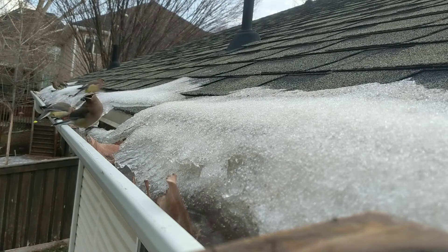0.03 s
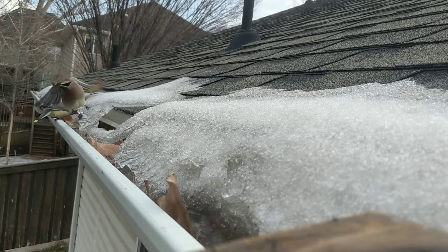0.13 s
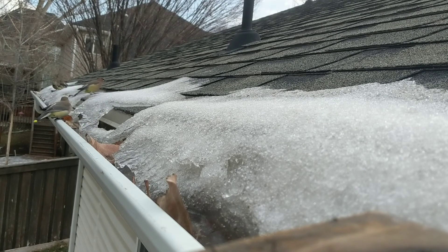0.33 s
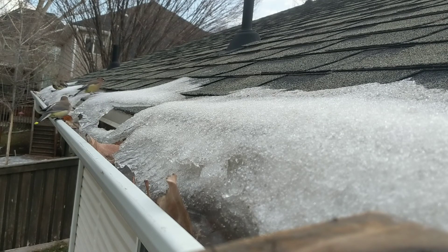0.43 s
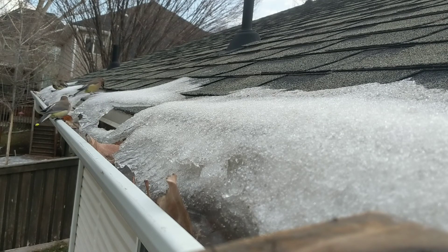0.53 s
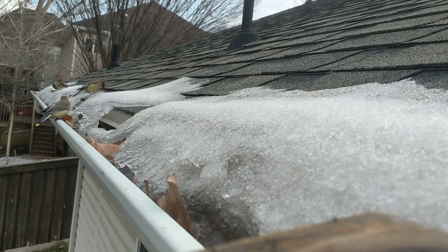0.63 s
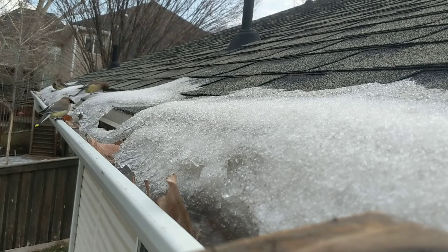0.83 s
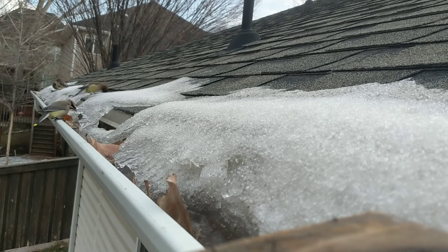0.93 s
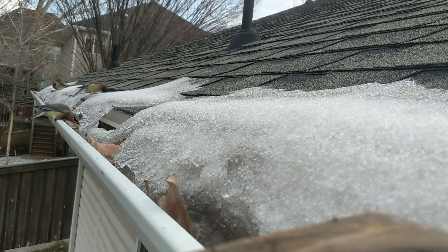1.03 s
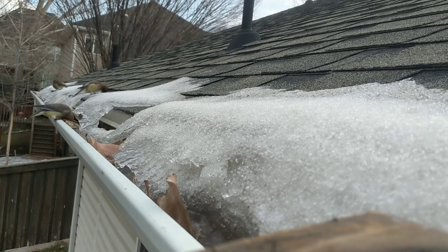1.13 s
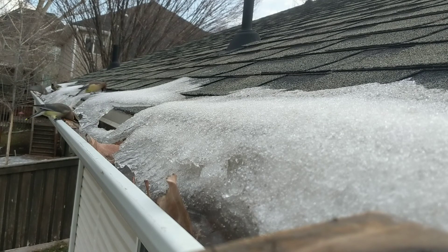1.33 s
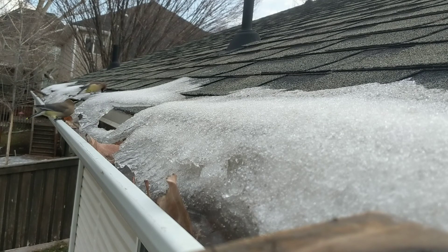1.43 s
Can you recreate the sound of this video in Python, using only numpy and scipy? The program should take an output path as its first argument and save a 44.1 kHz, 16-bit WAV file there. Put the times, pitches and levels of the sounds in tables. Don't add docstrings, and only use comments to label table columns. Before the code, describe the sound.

Faint hiss, low town rumble and distant bird whistles open. At about 0.2 seconds a small nearby bird gives a very high, fast trill, alternating between two close pitches until 0.43, with a light outdoor echo. Soft, rapid wingbeats flutter from 0.2 to 0.75, strongest near 0.45. Claws tick on metal around 1.05 and 1.45, with a dull thud at 1.0; faint flock calls and a distant engine continue.

```python
import sys
import numpy as np
from scipy import signal
from scipy.fft import rfft, irfft
from scipy.io import wavfile
from scipy.ndimage import uniform_filter1d

SR = 44100
rng = np.random.default_rng(int(sys.argv[2]) if len(sys.argv) > 2 else 0)


def how_loud(loudness_db):
    steps = np.asarray(loudness_db, float) / 20
    return 10 ** steps


def put_to_file(sound):
    columns = np.atleast_2d(sound).T
    safe = np.clip(columns, -1, 1)
    whole_steps = np.round(safe * 32767)
    wavfile.write(sys.argv[1], SR, whole_steps.astype(np.int16))


N = 66150

# rise_hz, rise_s, drop_hz, drop_start_share, pause_after_s
ARCHES = [
    (1270, 0.008, 3000, 0.56, 0.0025),
    (1230, 0.00254, 870, 0.62, 0.000068),
    (960, 0.00193, 2400, 0.63, 0.0016),
    (1010, 0.0017, 230, 0.73, 0.0019),
]
# snap_s, level_db
BEATS = [(0.226, -73), (0.271, -66.5), (0.328, -61), (0.379, -62.5), (0.428, -58.5), (0.476, -59.5),
         (0.524, -59), (0.577, -61.5), (0.631, -65.5), (0.679, -67), (0.732, -68)]


def rms_one(x):
    return x / np.sqrt(np.mean(x ** 2) + 1e-20)


def band(x, low_hz, high_hz, order=2):
    return signal.sosfilt(signal.butter(order, [low_hz, high_hz], "band", fs=SR, output="sos"), x)


def drift(rate_hz):
    r = np.exp(-2 * np.pi * rate_hz / SR)
    settled = signal.lfilter([1], [1, -2 * r, r * r], rng.standard_normal(N + SR))[SR:]
    return rms_one(settled)


def add(out, start_s, sound):
    i = max(int(start_s * SR), 0)
    out[i:i + len(sound)] += sound[:N - i]


def bump(t, centre_s, width_s):
    return np.exp(-((t - centre_s) / width_s) ** 2)


def tone(hz, level_db, edge_s):
    octave_db = -48
    t = np.arange(len(hz)) / SR
    phase = 2 * np.pi * np.cumsum(hz) / SR
    ends = np.sin(np.pi / 2 * np.clip(np.minimum(t, t[::-1]) / edge_s, 0, 1)) ** 2
    return how_loud(level_db) * ends * (np.sin(phase) + how_loud(octave_db) * np.sin(2 * phase))


def arch(length_s, top_hz, shape):
    drop_curve = 1.4
    rise_hz, rise_s, drop_hz, drop_start = shape[:4]
    t = np.arange(int(length_s * SR)) / SR
    slide = np.clip((t / length_s - drop_start) / (1 - drop_start), 0, 1)
    return top_hz - rise_hz * np.exp(-t / rise_s) - drop_hz * slide ** drop_curve


def coloured(spectrum, patchy_db):
    hz, db = np.transpose(spectrum)
    edges_hz = np.geomspace(hz[0], hz[-1], int(3 * np.log2(hz[-1] / hz[0])) + 1)
    white = rng.standard_normal((2, N + SR))
    together = drift(4)
    out = 0
    for k, (low_hz, high_hz) in enumerate(zip(edges_hz, edges_hz[1:])):
        level_db = np.interp(np.log(low_hz * high_hz) / 2, np.log(hz), db)
        flicker_db = patchy_db * (0.277 * together + drift(42))
        out = out + how_loud(level_db + flicker_db) * band(white[k % 2], low_hz, high_hz)[SR:]
    return rms_one(out)


def town_rumble():
    rumble_db = -63.5
    # centre_hz, density_db
    spectrum = [(30, -29), (45, -4), (64, -2.5), (98, -6.5), (128, -16), (160, -10.5), (388, -19),
                (900, -26)]
    # time_s, change_db
    traffic = [(0, -1.5), (.2, -0.5), (.33, 2.5), (.5, 1), (.63, 0.5), (0.799, -0.5), (1.049, 1), (1.3, -1),
               (1.5, 0.5)]
    swell_db = np.interp(np.arange(N) / SR, *np.transpose(traffic))
    return how_loud(rumble_db + swell_db) * coloured(spectrum, patchy_db=2.0)


def open_air():
    air_db = -72.5
    # centre_hz, density_db
    spectrum = [(800, -1.5), (1300, 0), (2200, -2.5), (4500, -8.5), (7000, -13), (8200, -16.5),
                (11000, -19.5), (16000, -16.5)]
    return how_loud(air_db) * coloured(spectrum, patchy_db=1.7)


def booms():
    # centre_s, pitch_hz, length_s, level_db
    boom_events = [(0.089, 59.4, 0.026, -58.5), (.15, 181.4, .06, -66.5), (0.287, 92.5, 0.035, -57),
                   (0.361, 59.8, 0.043, -57), (0.631, 88, 0.027, -56), (.66, 209, 0.037, -67.5),
                   (.82, 80, .05, -63), (1.04, 208, 0.023, -61), (1.12, 48.6, .05, -59),
                   (1.24, 71, 0.044, -61), (1.37, 62.4, 0.042, -64)]
    t = np.arange(N) / SR
    out = np.zeros(N)
    for s, hz, length_s, db in boom_events:
        out += how_loud(db) * bump(t, s, length_s) * np.sin(2 * np.pi * hz * (t - s))
    return out


def motor():
    # time_s, firing_hz, level_db
    speed = [(0, 104, -68), (.2, 109.5, -78), (0.348, 118.2, -66.5), (.5, 121.1, -64.5),
             (.62, 122.4, -61.5), (0.751, 125.1, -70.5), (.95, 128.8, -65), (1.0, 130, -74),
             (1.101, 132.5, -67), (1.5, 138.7, -64)]
    # firing_multiple, level_db
    orders = [
        (1, -0.5),
        (1.5, -11.5),
        (2.42, -16),
    ]
    s, hz, db = np.transpose(speed)
    t = np.arange(N) / SR
    turns = np.cumsum(np.interp(t, s, hz)) / SR
    tones = 0
    for multiple, order_db in orders:
        tones = tones + how_loud(order_db + drift(4.2)) * np.sin(2 * np.pi * multiple * turns)
    return how_loud(np.interp(t, s, db) + 1) * tones


def flock_chatter():
    low_hz, top_hz, flicker_db = 2200, 7600, 2.0
    # time_s, level_db
    chatter = [(0, -72.5), (.1, -75.5), (.5, -69), (.9, -78.5), (1.1, -74.5), (1.25, -84.5), (1.5, -73.5)]
    s, db = np.transpose(chatter)
    noise = band(rng.standard_normal(N), low_hz, top_hz, order=8)
    level_db = np.interp(np.arange(N) / SR, s, db) + flicker_db * drift(31)
    return how_loud(level_db) * rms_one(noise)


def far_birds():
    waver_hz, flicker_db, wet_db, smear_t60_s = 20, 6.0, -6, 0.1
    whistle_db, whistle_edge_s, mate_edge_s = -5.5, 0.0025, 0.0012
    # start_s, length_s, top_hz, level_db
    mate_notes = [(0.408, .012, 7540, -52), (0.159, 0.024, 7070, -70.5), (0.782, 0.014, 7350, -70.5),
                  (0.803, 0.012, 6970, -73), (0.832, 0.013, 7280, -78), (0.847, 0.011, 7100, -73),
                  (1.177, 0.016, 7180, -71), (1.206, 0.0051, 7240, -71), (1.216, 0.013, 7240, -65.5),
                  (1.388, 0.0089, 7000, -54.5), (1.3995, 0.018, 7166, -65), (1.415, 0.011, 7350, -72.5),
                  (1.429, 0.0092, 7400, -62.5), (1.468, 0.009, 7300, -69)]
    # start_s, length_s, from_hz, to_hz, level_db
    whistle_notes = [(0, 0.023, 3785, 4505, -60.5), (.002, 0.017, 5800, 5440, -65),
                     (0.018, 0.075, 4340, 4270, -67.5), (0.078, 0.038, 4220, 3750, -83),
                     (0.146, 0.014, 4820, 6600, -63), (.2355, 0.0032, 9600, 9250, -51),
                     (0.16, 0.05, 4510, 4480, -64), (0.201, 0.072, 3640, 3647, -64),
                     (0.28, 0.0061, 4830, 4000, -56.5), (0.324, 0.053, 2382, 2656, -66),
                     (0.639, 0.21, 3633, 3566, -71), (0.743, .016, 2874, 2700, -62.5),
                     (0.869, 0.009, 6500, 5400, -62), (0.879, 0.025, 3404, 3390, -64),
                     (0.902, 0.028, 3360, 3340, -68.5), (0.894, 0.038, 2154, 2250, -68.5),
                     (0.928, 0.039, 3263, 2870, -65.5), (.993, 0.047, 4130, 3500, -70),
                     (0.994, 0.056, 2650, 2374, -68), (1.062, 0.013, 5930, 5900, -65),
                     (1.068, 0.08, 5420, 5020, -70), (1.109, 0.011, 3450, 3340, -63),
                     (1.169, 0.019, 1628, 1540, -65.5), (1.382, 0.0039, 5450, 5250, -53),
                     (1.4146, 0.0059, 6760, 5340, -48.5), (1.418, 0.0059, 5910, 5350, -55.5),
                     (1.428, 0.02, 2357, 2460, -68), (1.484, 0.033, 5190, 4750, -58.5),
                     (1.488, .009, 6360, 6200, -61)]
    mates, whistles = np.zeros(N), np.zeros(N)
    for s, length_s, top_hz, db in mate_notes:
        add(mates, s, tone(arch(length_s, top_hz, ARCHES[3]), db, mate_edge_s))
    waver = waver_hz * drift(80)
    for s, length_s, from_hz, to_hz, db in whistle_notes:
        hz = np.linspace(from_hz, to_hz, int(length_s * SR))
        hz = hz + np.resize(waver[int(s * SR):], len(hz))
        add(whistles, s, tone(hz, db + whistle_db, whistle_edge_s))
    flicker = flicker_db * drift(100)
    direct = mates * how_loud(flicker / 2) + whistles * how_loud(np.minimum(flicker, 3))
    t = np.arange(SR // 4) / SR
    smear = rng.standard_normal(len(t)) * how_loud(-60 * t / smear_t60_s)
    smear = smear / np.sqrt(np.sum(smear ** 2))
    return direct + how_loud(wet_db) * signal.fftconvolve(direct, smear)[:N]


def gutter():
    tick_rise_s = 0.0002
    thud_s, thud_hz, thud_db, thud_t60_s = 1, 135, -49.5, 0.16
    # start_s, peak_db, centre_hz, t60_s
    claw_ticks = [(0.152, -54, 3060, 0.0042), (1.0243, -51.5, 6360, 0.0098), (1.0243, -52, 4700, 0.0027),
                  (1.025, -53, 1570, 0.0047), (1.0552, -39.5, 6100, 0.0028), (1.0545, -54, 7000, 0.0062),
                  (1.055, -50, 3700, 0.0036), (1.0578, -53, 7300, 0.0044), (1.4555, -46, 5570, 0.0031),
                  (1.4559, -43.5, 3600, 0.0017), (1.456, -48, 6850, 0.0057)]
    out, t = np.zeros(N), np.arange(int(0.3 * SR)) / SR
    for s, db, hz, t60_s in claw_ticks:
        rise = 1 - np.exp(-t / tick_rise_s)
        add(out, s, how_loud(db - 60 * t / t60_s) * rise * np.sin(2 * np.pi * hz * t))
    add(out, thud_s, -how_loud(thud_db - 60 * t / thud_t60_s) * np.sin(2 * np.pi * thud_hz * t))
    return out


def crackle():
    clicks_per_s, spread_s, crackle_db = 700, 0.018, -14
    t = np.arange(N) / SR
    effort = sum(how_loud(db + crackle_db) * bump(t, s, spread_s) for s, db in BEATS)
    clicks = (rng.random(N) < clicks_per_s / SR) * rng.standard_normal(N)
    puffs = uniform_filter1d(np.abs(clicks), size=60) * rng.standard_normal(N)
    return effort * rms_one(band(puffs, 3100, 10500, order=3))


def wings():
    swish_lead_s, swish_s, swish_db = 0.018, 0.0079, -19.5
    push_lead_s, push_hz, push_db = 0.0084, 110, -0.5
    whirr_s, whirr_db = 0.024, -8.5
    snap_s, snap_low_hz, snap_top_hz = 0.0031, 700, 7600
    grain_db = 3.5
    t = np.arange(N) / SR
    swish, snap, push, whirr = np.zeros((4, N))
    for s, db in BEATS:
        swish += how_loud(db + swish_db) * bump(t, s - swish_lead_s, swish_s)
        snap += how_loud(db) * bump(t, s, snap_s)
        whirr += how_loud(db + whirr_db) * bump(t, s, whirr_s)
        cycles = (t - s + push_lead_s) * push_hz
        push += how_loud(db + push_db) * np.exp(-cycles ** 2 * 1.1) * np.sin(2 * np.pi * cycles)
    grain = how_loud(grain_db * drift(200))
    noise = rng.standard_normal((3, N))
    swish_noise = rms_one(band(noise[0], 5600, 11600, order=3))
    snap_noise = rms_one(band(band(noise[1], snap_low_hz, snap_top_hz), 300, snap_top_hz))
    whirr_noise = rms_one(band(noise[2], 5520, 6300))
    return grain * (swish * swish_noise + whirr * whirr_noise) + snap * snap_noise + push


def trill():
    end_s, edge_s, waver_hz = 0.426, 0.0012, 7.2
    throat_hz, throat_db_per_khz = 6430, 14.5
    # start_s, top_hz, early_db, middle_db, late_db
    trill_notes = [(0.2195, 7065, -47, -29, -28.5), (0.2419, 7513, -30, -32.5, -29.5),
                   (.257, 6940, -32.5, -33, -33.5), (.279, 7530, -30.5, -37.5, -39),
                   (0.2962, 7160, -30.5, -29.5, -34), (0.3164, 7400, -39.5, -51.5, -37),
                   (0.3335, 6910, -44.5, -59, -35), (0.3551, 7300, -34.5, -51, -39.5),
                   (0.3731, 6910, -37, -36.5, -32.5), (0.393, 7610, -36.5, -45.5, -38),
                   (0.408, 6750, -36.5, -39, -49)]
    level_places = [
        (0.2, .52, .8),
        (.17, 0.56, 0.96),
        (.17, 0.43, 0.84),
        (0.13, 0.48, .85),
    ]
    out, waver = np.zeros(N), waver_hz * drift(150)
    ends_s = [row[0] for row in trill_notes[1:]] + [end_s]
    kinds = [0] + [2 - k % 2 for k in range(1, len(trill_notes) - 1)] + [3]
    for (s, top_hz, *db), stop_s, kind in zip(trill_notes, ends_s, kinds):
        pause_s = ARCHES[kind][4]
        hz = arch(stop_s - s - pause_s, top_hz, ARCHES[kind])
        place = np.interp(np.linspace(0, 1, len(hz)), np.sort(level_places[kind]), [0, 1, 2])
        eased = place - np.sin(2 * np.pi * place) / (2 * np.pi)
        level_db = np.interp(eased, [0, 1, 2], db)
        level_db = level_db - throat_db_per_khz * np.maximum(throat_hz - hz, 0) / 1000
        add(out, s, tone(hz + waver[int(s * SR):][:len(hz)], level_db, edge_s))
    return out


def outdoors(x):
    # delay_s, level_db
    echoes = [
        (0.0136, -18.5),
        (0.028, -28),
    ]
    echo_low_hz, echo_top_hz = 6450, 10000
    t = np.arange(SR) / SR
    tail = np.zeros(SR)
    for level_db, t60_s in ((-17, 0.25), (-26, 0.66)):
        decay = rng.standard_normal(SR) * how_loud(-60 * t / t60_s) * (t > 0.004)
        tail += how_loud(level_db) * decay / np.sqrt(np.sum(decay ** 2))
    click = band(signal.unit_impulse(400), echo_low_hz, echo_top_hz, order=4)
    for delay_s, db in echoes:
        tail[int(delay_s * SR):][:400] += how_loud(db) * click
    return x + signal.fftconvolve(x, tail)[:N]


def scene():
    background = town_rumble() + open_air() + booms() + motor() + flock_chatter()
    echoing = outdoors(far_birds() + gutter() + trill())
    return (background + crackle() + wings() + echoing)[None]


def starve(x):
    # low_hz, high_hz, from_s, to_s
    starved = [(8000, 9200, .243, .333), (9200, 11300, .243, .311), (8000, 8900, .364, .401)]
    hz, t = np.fft.rfftfreq(N, 1 / SR), np.arange(N) / SR
    for low_hz, high_hz, from_s, to_s in starved:
        gate = uniform_filter1d(((t > from_s) & (t < to_s)) * 1., size=150)
        x = x - gate * irfft(rfft(x) * ((hz > low_hz) & (hz < high_hz)), N)
    return x


def roll_off(x):
    return signal.sosfilt(signal.butter(12, 15720, fs=SR, output="sos"), x)


def record(dry):
    hiss_db, hiss_tilt, cutoff_hz = -80.5, 0.13, 16800
    hiss = signal.lfilter([1], [1, -hiss_tilt], rng.standard_normal(dry.shape))
    noisy = dry + how_loud(hiss_db) * rms_one(hiss)
    cut = signal.sosfilt(signal.cheby2(12, 60, cutoff_hz, fs=SR, output="sos"), noisy)
    mix = starve(cut)
    return roll_off(mix)


dry = scene()
out = record(dry)
put_to_file(out)
```